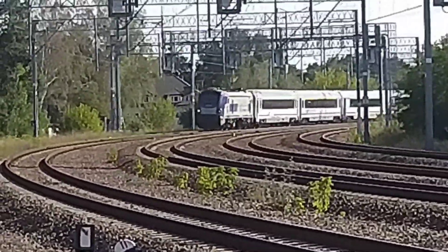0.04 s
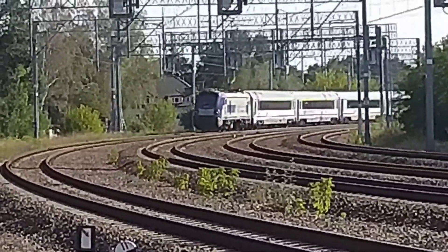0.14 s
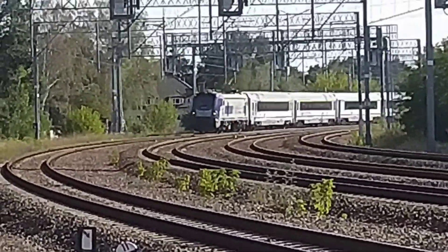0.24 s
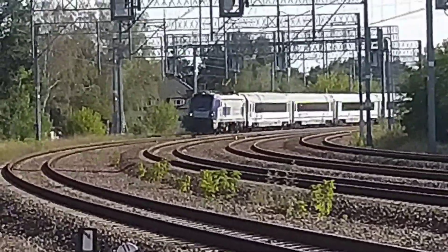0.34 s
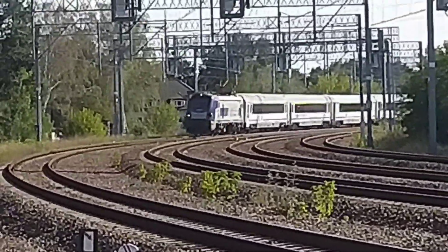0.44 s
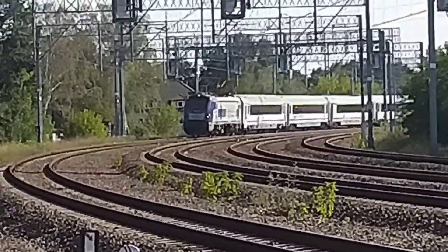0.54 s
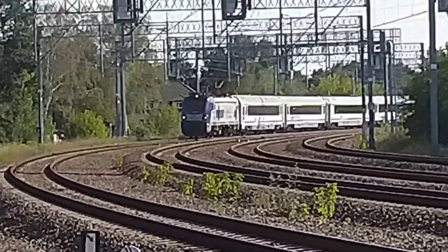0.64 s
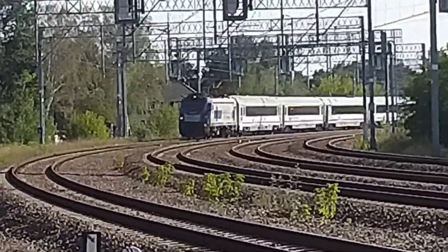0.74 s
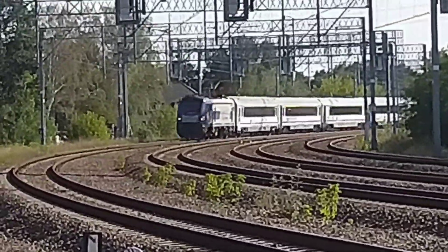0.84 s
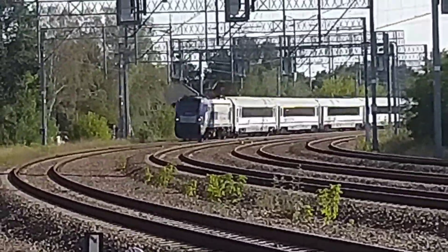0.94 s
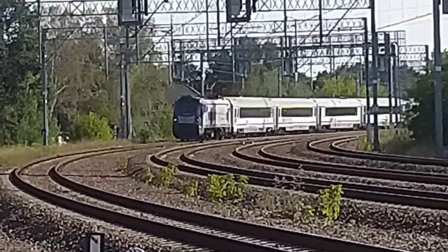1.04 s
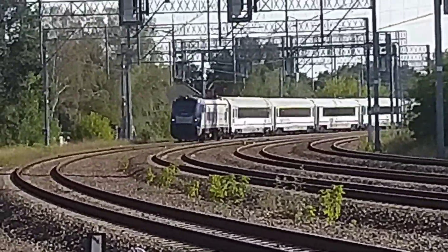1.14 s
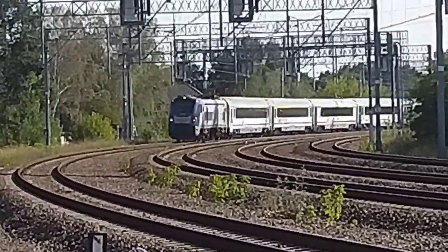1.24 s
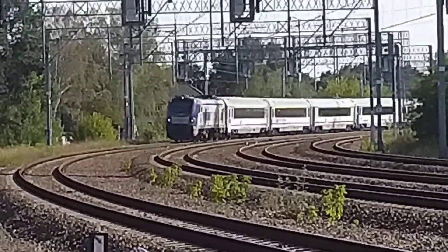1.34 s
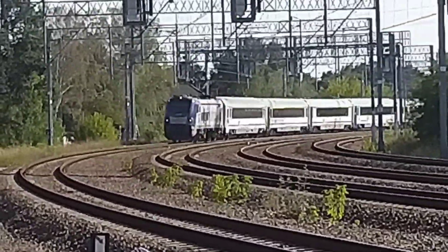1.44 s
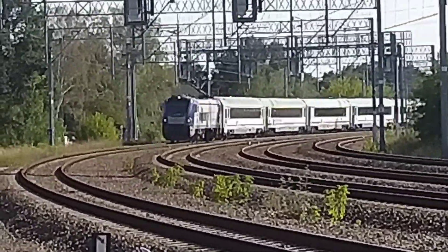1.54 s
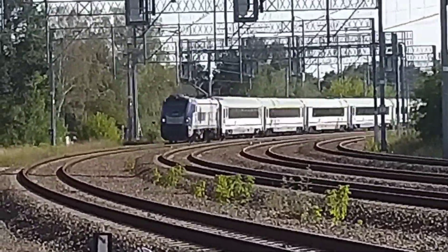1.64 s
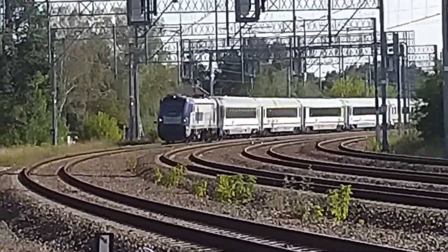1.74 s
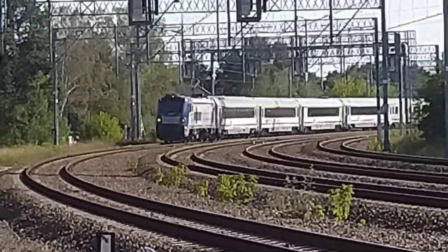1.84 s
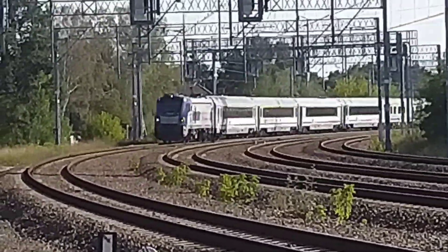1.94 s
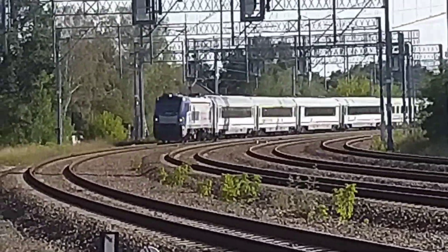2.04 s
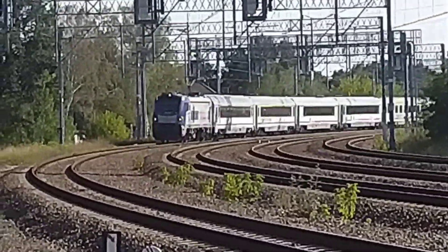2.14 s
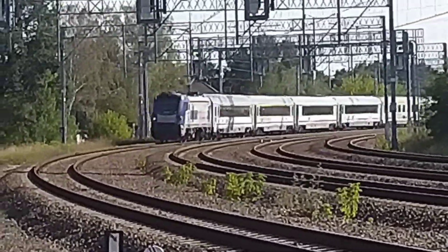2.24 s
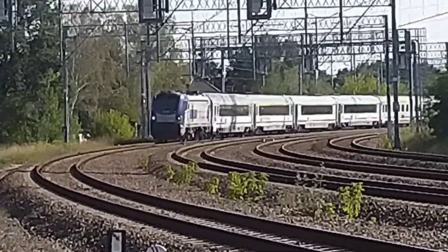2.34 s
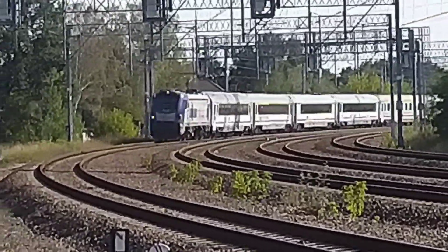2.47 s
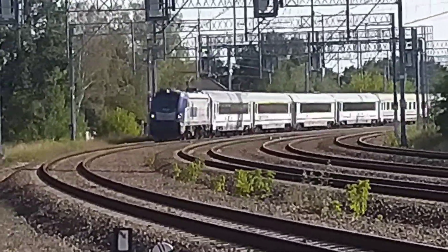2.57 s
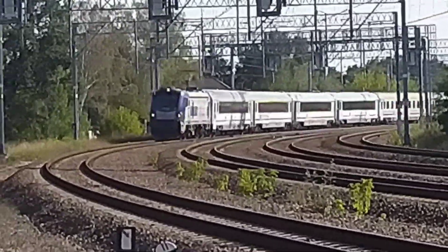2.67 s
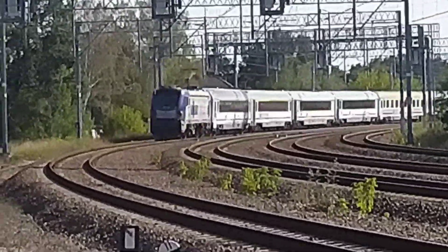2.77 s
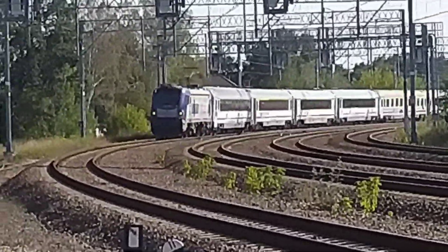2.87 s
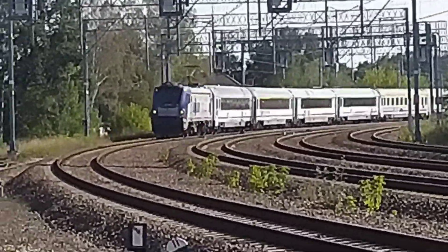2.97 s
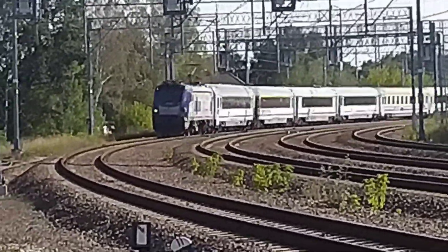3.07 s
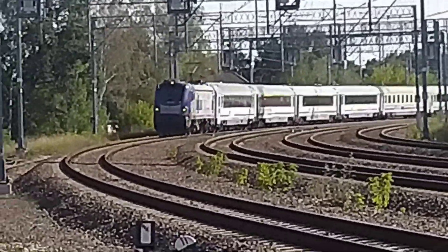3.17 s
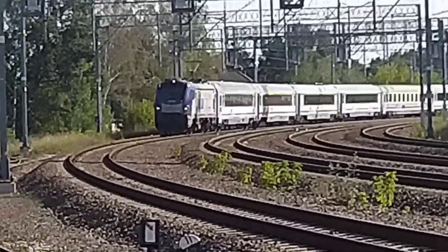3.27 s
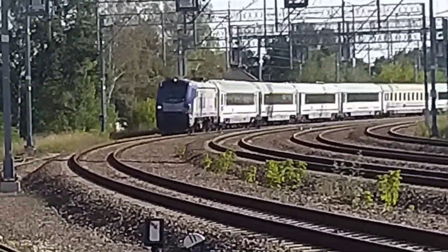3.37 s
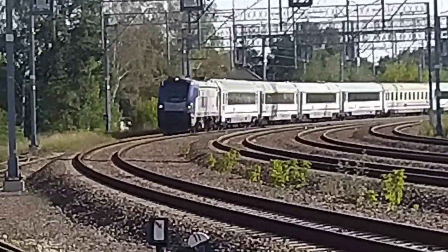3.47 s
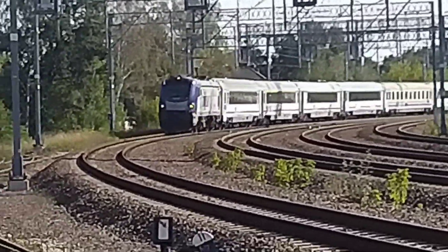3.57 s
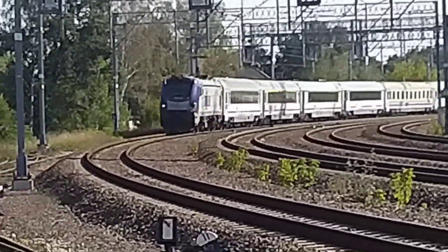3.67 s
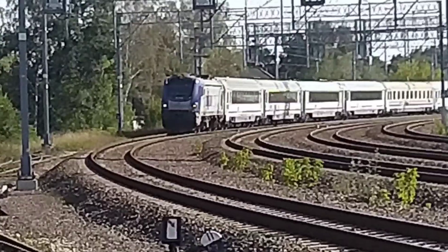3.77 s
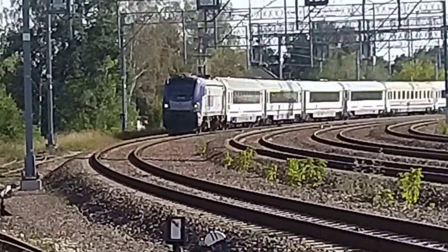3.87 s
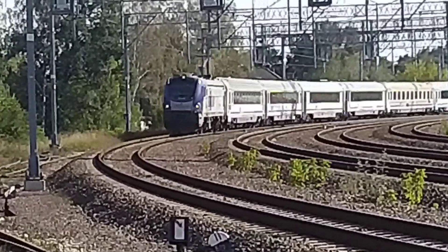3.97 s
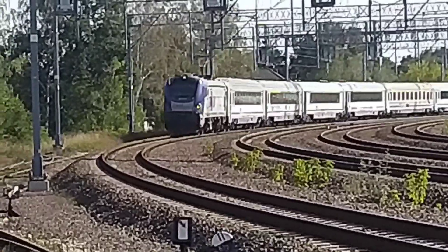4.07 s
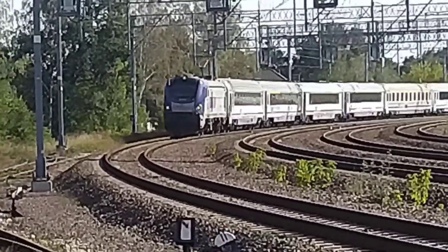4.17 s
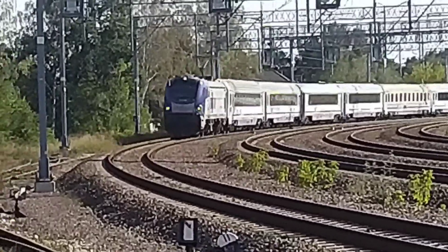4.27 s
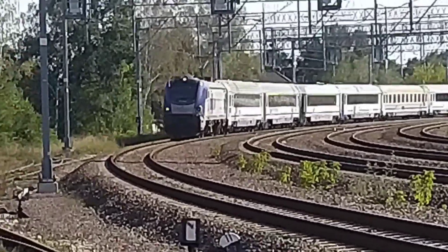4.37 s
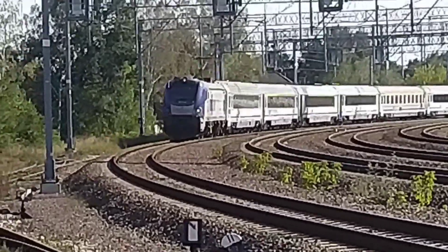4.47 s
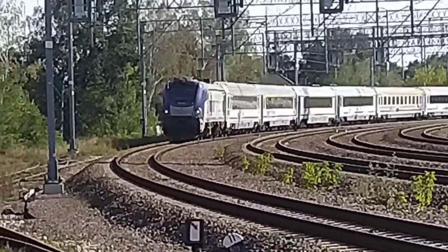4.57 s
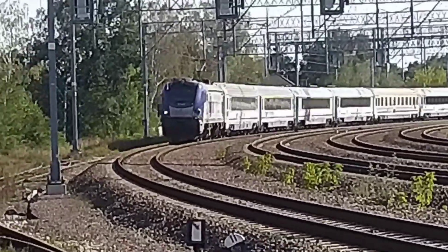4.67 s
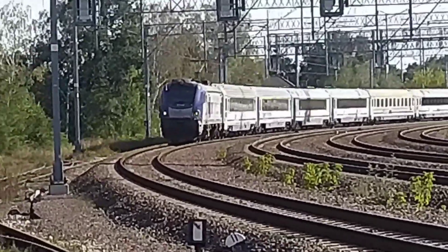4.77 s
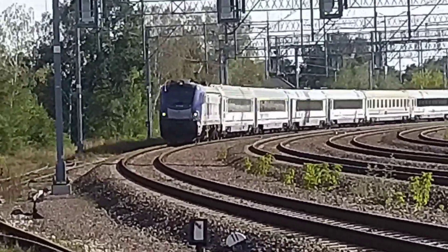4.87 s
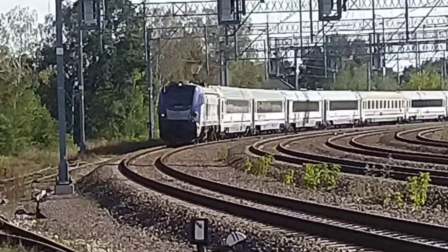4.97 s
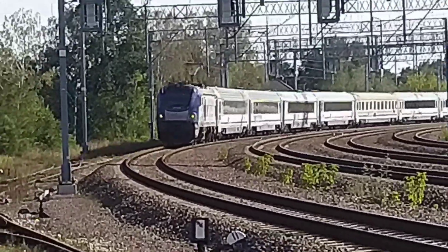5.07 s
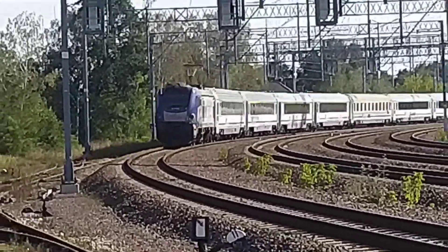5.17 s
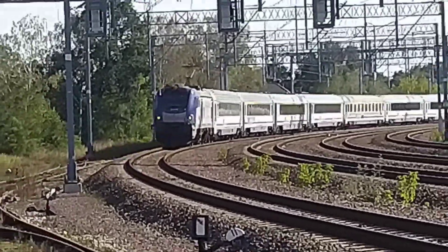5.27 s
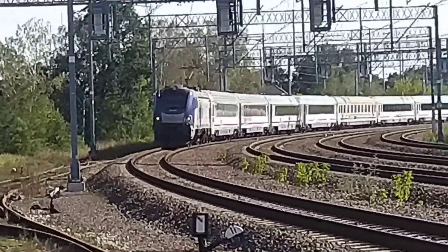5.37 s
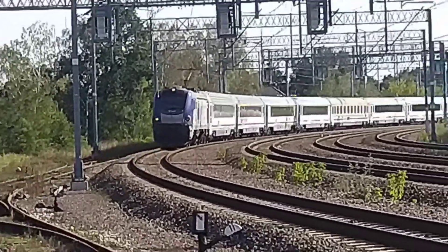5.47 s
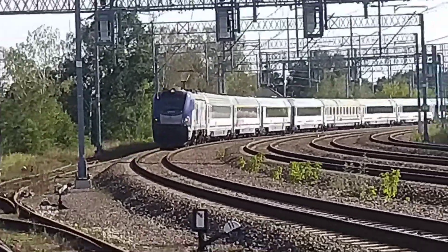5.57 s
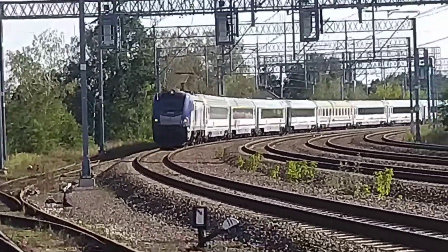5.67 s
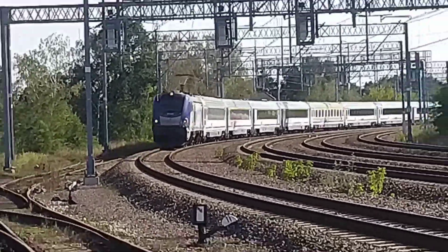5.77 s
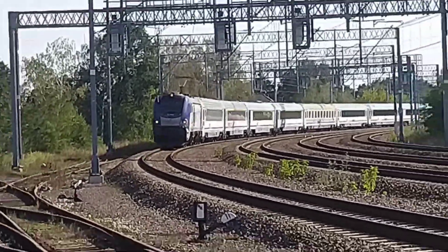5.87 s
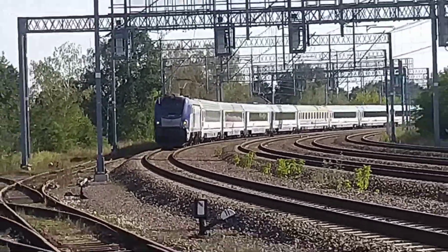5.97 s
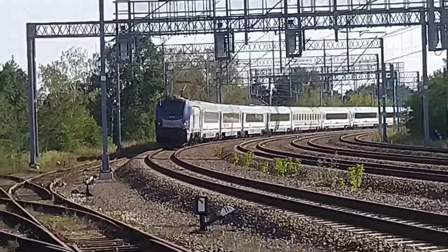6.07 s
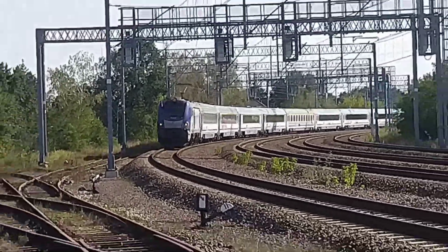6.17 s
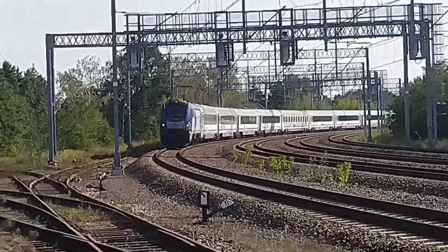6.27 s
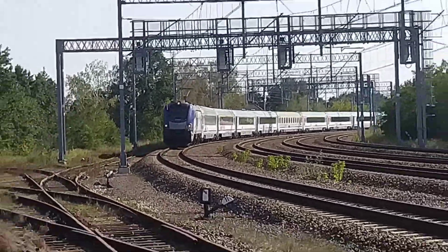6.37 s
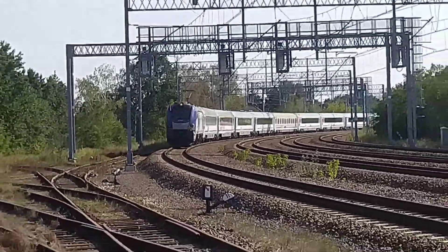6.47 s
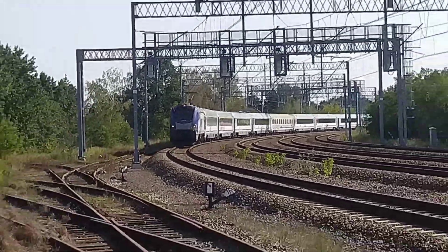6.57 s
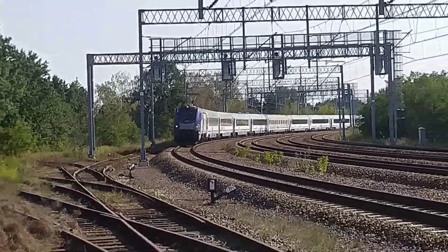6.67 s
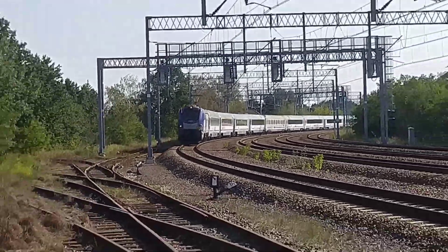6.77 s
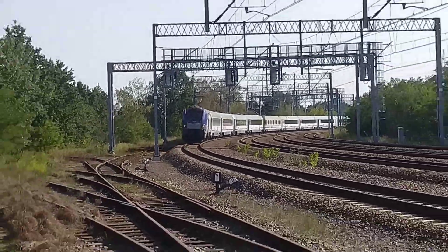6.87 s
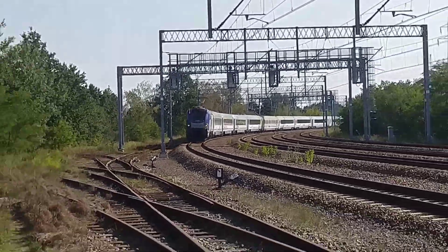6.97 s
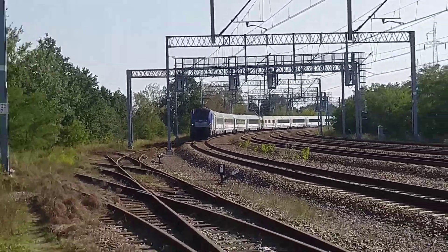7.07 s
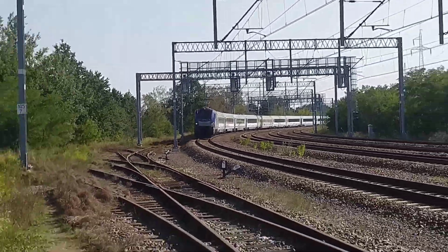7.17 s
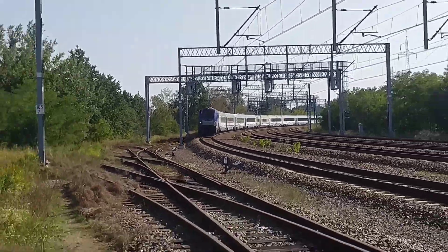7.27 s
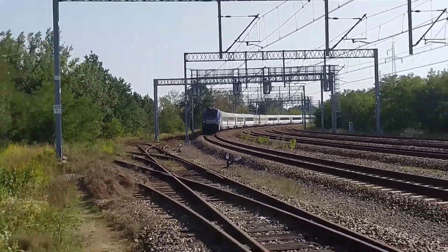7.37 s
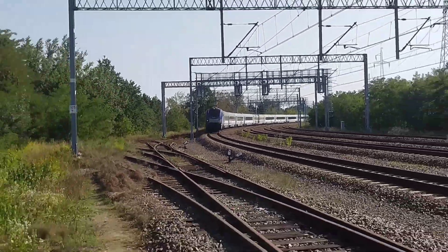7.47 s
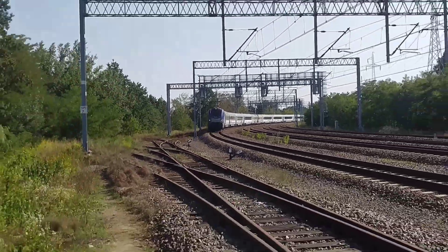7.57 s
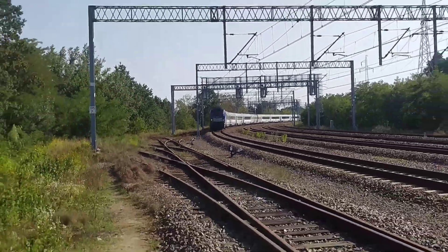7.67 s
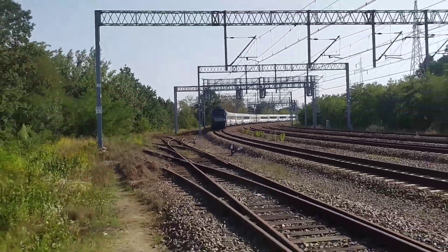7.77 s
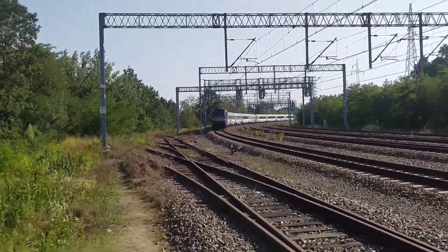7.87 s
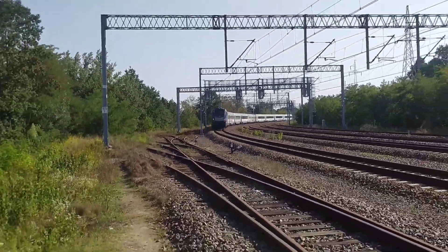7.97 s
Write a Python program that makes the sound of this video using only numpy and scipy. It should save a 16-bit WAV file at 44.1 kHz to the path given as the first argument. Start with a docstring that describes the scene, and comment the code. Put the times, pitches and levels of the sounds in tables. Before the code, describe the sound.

The rolling roar of an approaching electric train builds gradually outdoors, with a thin, intermittent zoom motor whine and light handling bumps.

```python
"""Beside a railway curve, an electric passenger train approaches and slowly grows louder.
Its wheels turn five times a second, so their rough treads and small flats drive the resonances of
rails and sleepers periodically: gliding pings recur in the roar, and the ground rumbles underneath.
Close by on the right, the zoom motor of a hand-held camera sizzles in fits and starts, and fingers
bump the camera body. Faint hums and the hiss of the open air lie behind."""
import sys
import numpy as np
from scipy import signal
from scipy.fft import rfft, irfft, next_fast_len
from scipy.io import wavfile
from scipy.ndimage import uniform_filter1d

SR = 44100
rng = np.random.default_rng(int(sys.argv[2]) if len(sys.argv) > 2 else 0)


def put_to_file(sound):
    """Save the sound as 16-bit audio at rate SR, in the file named by the first command-line argument."""
    columns = np.atleast_2d(sound).T  # one column per channel
    safe = np.clip(columns, -1, 1)
    whole_steps = np.round(safe * 32767)
    wavfile.write(sys.argv[1], SR, whole_steps.astype(np.int16))


N = 353858

TURN_S = .2005   # one revolution of a wheel
# level difference between the channels: frequency_hz, left_minus_right_db
BALANCE = [(60, 4.5), (400, 3), (880, 2.5), (1100, 0.5), (1330, -7.5), (1400, -6), (1900, -7.5),
           (2400, -23), (3500, -10.5), (5500, -13), (7000, -8.5), (8500, -22), (11000, -14.5),
           (13500, -32.5)]


def from_db(db):
    """Amplitude ratio of a level in decibels."""
    return 10 ** (np.asarray(db) / 20)


def rms_one(x):
    """Normalisation to unit mean power."""
    return x / np.sqrt(np.mean(x ** 2) + 1e-20)


def seconds():
    """The time of every sample."""
    return np.arange(N) / SR


def in_time(points):
    """Linear interpolation of a curve over time."""
    return np.interp(seconds(), *np.transpose(points))


def at_hz(points, hz):
    """Interpolation of a curve on a logarithmic frequency axis."""
    knots, values = np.transpose(points)
    return np.interp(np.log(hz + 1), np.log(knots), values)


def drift(rate_hz):
    """Slow random modulation: up to 2000 values of unit spread, joined by straight lines."""
    knots = rng.standard_normal(2000)
    return np.interp(seconds() * rate_hz, np.arange(len(knots)), rms_one(knots))


def resonances(modes, hz):
    """Frequency response of loosely coupled resonators, whose powers add."""
    return np.sqrt(sum(from_db(2 * db) * (hz * width) ** 2 / ((f * f - hz * hz) ** 2 + (hz * width) ** 2)
                       for f, width, db in modes))


def stereo_field(pair, response):
    """Partial coherence: two independent signals are filtered and mixed into left and right."""
    # similarity of the channels: frequency_hz, coherence_ratio
    coherence = [(60, 0.94), (1000, 0.89), (1320, 0.71), (1400, 0.11), (2100, 0.24), (3000, 0.035),
                 (6200, 0.26), (6900, 1), (7400, 0.29), (9000, .1), (12000, .45), (14000, .1)]
    # phase difference between the channels: frequency_hz, left_lead_rad
    phase_lead = [(60, 0), (450, 0.5), (900, 0.36), (1120, 0.4), (1350, -1), (1800, 2), (2700, 3),
                  (5500, -2), (6500, -2.5), (7300, -2.5), (10000, -53), (12000, -1), (13500, -1)]
    size, sides = next_fast_len(N + 8192), np.array([[1], [-1]])
    hz = np.arange(size // 2 + 1) * SR / size
    mid, side = rfft(np.array(pair), size) * response(hz)
    alike = np.clip(at_hz(coherence, hz), 0, 1)
    mixed = np.sqrt(1 + alike) * mid + sides * np.sqrt(1 - alike) * side
    phase = np.exp(.5j * sides * at_hz(phase_lead, hz))
    pan = 1 / np.sqrt(1 + from_db(-2 * sides * at_hz(BALANCE, hz)))
    out = irfft(phase * pan * mixed, size)[:, :N]
    return out / np.std(out.mean(axis=0))


def noise(spectrum):
    """Spectral shaping of white noise, in stereo; the mean of the channels has unit power."""
    return stereo_field(rng.standard_normal((2, N)), lambda hz: from_db(at_hz(spectrum, hz)))


def whistle(lines):
    """A line spectrum: sines broadened by slight random frequency modulation."""
    return sum(np.sqrt(2) * from_db(db) * np.sin(2 * np.pi * np.cumsum(hz + wobble * drift(60)) / SR)
               for hz, wobble, db in lines)


def open_air():
    """Stationary broadband noise: the faint, even hiss of the open air."""
    # spectrum of the air: frequency_hz, density_db
    air_spectrum = [(3000, 3), (7000, -3), (8300, -1), (10400, 6.5), (14500, -13)]
    return from_db(-82) * noise(air_spectrum)


def far_hums(fade_s=.27, waver_db=1.5):
    """Low tones under slow amplitude modulation: each fades in, wavers and fades out."""
    # faint hums: start_s, stop_s, pitch_hz, level_db
    hums = [(-0.3, 1.28, 442.3, -63), (-0.1, 1.4, 51.4, -53.5), (1.3, 6.5, 52.06, -57),
            (1.3, 3.55, 63.7, -61), (1.5, 3.5, 128.1, -64.5), (4, 7.2, 159.8, -66)]
    t, out = seconds(), np.zeros(N)
    for start, stop, hz, db in hums:
        fade = np.clip(np.minimum(t - start, stop - t) / fade_s, 0, 1)
        out += fade * from_db(waver_db * drift(20)) * whistle([(hz, 2, db)])
    return out * from_db([[1.5], [-1.5]])


def damped_mode(age, hz, t60_s):
    """Free vibration after a soft impact: it builds in about half a cycle and decays exponentially."""
    onset = 1 - np.exp(-2 * hz * age)
    decay = np.exp(-np.log(1000) * np.minimum(age / t60_s, 10))
    return onset * decay * np.sin(2 * np.pi * hz * age)


def finger_knocks():
    """Impact excitation: fingers ring a low mode of the camera body, and hard contacts add a tick."""
    # bumps on the body: start_s, level_db, pitch_hz, t60_s, relative_tick_db
    bumps = [(0.0, -38, 35.7, 0.25, -38), (1.246, -30, 37.6, 0.19, -30), (1.262, -42, 92, 0.29, -20),
             (1.268, -35.5, 204, 0.055, -20), (4.668, -24, 340, 0.02, 1), (4.679, -35, 171, 0.056, -27)]
    # upper modes of the body: pitch_hz, level_db
    tick_modes = [(1000, -1.5), (1650, -11)]
    out = np.zeros(N)
    for start, db, hz, t60_s, tick_db in bumps:
        age = np.maximum(seconds() - start, 0)
        tick = sum(from_db(tick_db + mode_db) * damped_mode(age, f, t60_s=.016)
                   for f, mode_db in tick_modes)
        out += from_db(db) * (damped_mode(age, hz, t60_s) + tick)
    return out * from_db([[1.5], [-1.5]])


def barrel_clack():
    """A transient at the lens barrel's main resonance, as it is jerked back into motion."""
    # the single clack: centre_s, pitch_hz, level_db, half_length_s
    clack = (7.5523, 7000, -32, .0012)
    centre_s, hz, db, half_s = clack
    offset = seconds() - centre_s
    envelope = from_db(db) * np.exp(-(offset / half_s) ** 2)
    return envelope * np.sin(2 * np.pi * hz * offset) * from_db([[-5], [3]])


def motor_envelopes(coast_db_per_s=163, idle_db=-18.5, whine_rise_s=.043):
    """Starting transient and exponential run-down: the amplitudes of gear hiss, rattle and whine."""
    # runs of the zoom motor: start_s, stop_s, effort_db, speed_name
    runs = [(0.226, 0.35, -14, "slow"), (0.402, 0.42, -18, "slow"), (0.463, 0.475, -19, "slow"),
            (0.528, 0.562, -14.5, "slow"), (0.799, 2.064, -0.6, "slow"), (2.13, 2.5, 0, "slow"),
            (2.581, 2.855, -1.2, "slow"), (2.927, 4.57, 0.73, "slow"), (4.877, 5.258, 2.1, "fast"),
            (5.423, 5.633, -1, "fast"), (5.897, 5.98, -2, "fast"), (6.058, 6.132, 0.5, "fast"),
            (6.227, 6.26, -1.5, "fast"), (6.324, 6.798, -0.5, "fast"), (6.899, 7.145, -1.5, "fast"),
            (7.247, 7.43, -2.5, "fast"), (7.536, 7.592, -2, "fast"), (7.683, 8.027, -3.5, "fast")]
    # base levels for each speed_name: hiss_db, rattle_db, whine_db
    speed_levels = {"slow": (-54, -60.5, -49.5), "fast": (-51, -52.5, -53.5)}
    # as the lens races out to wide angle, the load moves from the gears to the barrel
    race_from_s, hiss_fall_db_per_s, rattle_rise_db_per_s = 4.877, .5, 3.5
    t, drive = seconds(), np.zeros((3, N))
    next_starts = [run[0] for run in runs[1:]] + [N / SR]
    for (start, stop, effort_db, speed), end in zip(runs, next_starts):
        hiss_db, rattle_db, whine_db = speed_levels[speed]
        span = slice(int(start * SR), int(end * SR))
        age, raced_s = np.maximum(t[span] - start, 0), np.maximum(t[span] - race_from_s, 0)
        coast_db = np.maximum(-coast_db_per_s * np.maximum(t[span] - stop, 0), idle_db)
        # the teeth tick as they take up their slack, then scrape hard for a moment
        jerk_db = 3.5 * np.exp(-age / .0078) + 5 * np.exp(-age / .17)
        hiss = from_db(hiss_db + effort_db + coast_db + jerk_db - hiss_fall_db_per_s * raced_s)
        rattle = from_db(rattle_db + effort_db + .88 * coast_db + rattle_rise_db_per_s * raced_s)
        # the high whine needs some speed and is the first to go
        whine = (1 - np.exp(-age / whine_rise_s)) * from_db(whine_db + 2 * effort_db + 1.4 * coast_db)
        drive[:, span] = hiss, rattle, whine
    return uniform_filter1d(drive, size=32, axis=1)


def zoom_motor(barrel_lag_s=.0066, mesh_depth=.084, flutter_db=1.5):
    """Gear noise and forced vibration: meshing teeth hiss, whine and rattle the lens barrel."""
    # spectra of the gears and the barrel: frequency_hz, density_db
    gear_spectrum = [(8500, -68), (9100, -57), (9500, -39), (9900, -49), (10600, -47), (11100, -28),
                     (11900, 4.5), (12450, 11), (13000, 10.5), (13400, 14), (13900, -1), (14400, -1),
                     (15000, -13)]
    barrel_spectrum = [(4000, -20.5), (4850, -36), (5100, -14), (5350, -8), (5650, -15), (6000, -11.5),
                       (6300, -21.5), (6600, 0), (7000, 8.5), (7220, 2), (7420, -33), (8300, -117),
                       (9200, -15), (9700, -29), (10800, -21), (11800, -1.5), (13000, -20.5)]
    # tones of the motor and the barrel: pitch_hz, wobble_hz, level_db
    high_lines = [(12720, 3, 0), (12688, 5, -14), (12815, 8, -11), (12844, 10, -11)]
    lower_lines = [(9941, 14, 0)]
    barrel_lines = [(6491, 18, -15), (6977, 14, -9), (7099, 14, -11)]
    # the lower whine sets in with the fast zoom and sings on through the pauses: time_s, level_db
    lower_swell = [(4.75, -100), (5, -75), (5.8, -78), (6.4, -76), (6.6, -69), (7.3, -71), (8, -63)]
    hiss, rattle, whine = motor_envelopes()
    # the barrel is slow to follow the gears
    pole = np.exp(-1 / (barrel_lag_s * SR))
    rattle = signal.lfilter([(1 - pole) ** 2], [1, -2 * pole, pole ** 2], rattle)
    # three gear wheels throb, each at its own rate, under an uneven load
    throb = sum(share * np.sin(2 * np.pi * hz * seconds() + .92 * drift(2.06))
                for hz, share in [(32.3, .9), (41, 1), (95.9, .87)])
    load = (1 + mesh_depth * throb) * from_db(flutter_db * drift(40) + 1.2 * drift(4.7))
    ringing = whistle(barrel_lines) * from_db([[-5], [3]])
    lower_gain = from_db(in_time(lower_swell) + 1.3 * drift(8))
    lower_whine = lower_gain * whistle(lower_lines) * from_db([[-12], [5]])
    barrel = rattle * from_db(3 * drift(30) + .36 * drift(330)) * (noise(barrel_spectrum) + ringing)
    gears = (hiss + from_db(-77)) * noise(gear_spectrum)
    high_whine = whine * whistle(high_lines) * from_db([[-25], [5.5]])
    return barrel + load * (lower_whine + gears + high_whine)


def approaching(start_db, loss_db_per_m, start_m=350, speed_m_per_s=14.5):
    """Spherical spreading and damping along the track: both losses shrink as the train nears."""
    covered_m = speed_m_per_s * seconds()
    return from_db(start_db + loss_db_per_m * covered_m) * start_m / (start_m - covered_m)


def rolling_force(rail_roughness_db=5, blow_db=-3, blow_s=.009, wander_db=.7, jolt_s=.005):
    """Roughness excitation: each tread and its flat recur once a turn; the rail is always new."""
    # wheels with a flat spot: first_blow_s, extra_turn_ms, relative_blow_db
    flats = [(.056, .02, -4), (.0785, 0, -1), (.125, -.06, -4), (.152, -.08, -3), (.178, .22, -5)]
    # a wheel comes down harder than usual: time_s, extra_force_db
    hard_blows = [(1.886, 5), (3.688, 4), (3.809, 8), (4.089, 5)]
    t, force = seconds(), np.zeros(N)
    for first_s, extra_ms, flat_db in flats:
        turn_s = TURN_S + extra_ms / 1000
        tread = rng.standard_normal(int(turn_s * SR))
        # the flat is a short, very rough stretch of the tread
        length = int(blow_s * SR)
        blow = rms_one(np.hanning(length) * rng.standard_normal(length))
        tread[:length] += np.sqrt(turn_s / blow_s) * from_db(flat_db + blow_db) * blow
        turn_fraction = (t - first_s + blow_s / 2) / turn_s % 1
        contact = (turn_fraction * len(tread)).astype(int) % len(tread)
        force += tread[contact] * from_db(wander_db * drift(1.4))
    jolts = 1 + sum(from_db(db) * np.exp(-((t - s) / jolt_s) ** 2) for s, db in hard_blows)
    return jolts * rms_one(rms_one(force) + from_db(rail_roughness_db) * rng.standard_normal(N))


def ground_vibration(rolling, swell_db=1.5):
    """Ground-borne vibration: the rolling force drives deep, booming modes over a steady rumble."""
    # resonances of the ground: pitch_hz, width_hz, level_db
    ground_modes = [(38.6, 4, -17), (48.2, 23, 9.5), (64.2, 2.7, 3)]
    # course of the boom: time_s, level_db
    boom_levels = [(0, -52.5), (1.2, -57.5), (1.7, -62), (2.3, -56), (3.2, -51.5), (3.7, -56.5),
                   (4.3, -55.5), (4.8, -56), (5.6, -57.5), (6.4, -57), (6.7, -55), (6.95, -49), (7.4, -56),
                   (8, -51)]
    # spectrum of the rumble: frequency_hz, density_db
    rumble_spectrum = [(10, -18), (22, -1.5), (40, -6.5), (76, -6), (130, -5), (205, -4), (270, -10.5),
                       (390, -12), (445, -9), (500, -12), (700, -11), (2500, -95)]
    gain = from_db(in_time(boom_levels) + swell_db * drift(6))
    shaking = [rolling + rng.standard_normal(N), rng.standard_normal(N)]
    boom = stereo_field(shaking, lambda hz: resonances(ground_modes, hz) / (1 + (hz / 85) ** 6))
    return gain * boom + from_db(-52.5) * noise(rumble_spectrum)


def wheel_hiss():
    """Radiation from the wheels: the treble of the rolling noise, rising as the distance falls."""
    # spectrum of the wheels: frequency_hz, density_db
    wheel_spectrum = [(900, -9.5), (1370, -2.5), (1470, -0.5), (1530, 0), (1580, 4), (1640, -2.5),
                      (1715, 4.5), (1800, -2.5), (2100, 1.5), (2400, 8.5), (2650, -0.5), (3000, -5.5),
                      (3500, -14), (4500, -19.5), (5400, -13.5), (7000, -15), (9000, -100)]
    # propagation of the hiss: start_db, loss_db_per_m
    wheel_path = (-56, 0.063)
    return approaching(*wheel_path) * noise(wheel_spectrum)


def tread_pings(sleeper_gain, rail_gain, sleeper_top_hz=700, fade_db_per_s=.15, wander_db=1.3):
    """Periodic excitation: each worn patch of tread rings a short gliding tone once a turn."""
    # pings of the track: first_s, pitch_hz, glide_hz_per_s, half_length_s, level_db
    pings = [(.0197, 870, -2900, .008, -2.5), (.049, 648, 500, .028, 0.5), (.056, 745, -1700, .012, -9),
             (.0576, 968, 3700, .007, -5), (.063, 468, 500, .026, -2.7), (.081, 985, 0, .007, -3),
             (.085, 1210, 7000, .009, -7), (.086, 874, -400, .021, -1.2), (.111, 774, -400, .022, -4.3),
             (.113, 1280, -2800, .008, -11), (.1225, 950, -6400, .004, -3.5), (.143, 808, -3700, .012, -8),
             (.1477, 917, -11000, .011, -3), (.1914, 1270, -3700, .006, -6),
             (.1973, 874, -4800, .012, -2.2), (.198, 771, 3900, .012, -6), (.199, 474, -300, .026, -2),
             (.213, 975, 2000, .012, -6), (.039, 1118, 1500, .011, -10), (.155, 1235, -3300, .014, -8),
             (.178, 1108, -1500, .012, -12)]
    t, out = seconds(), np.zeros((2, N))
    for first_s, hz, glide, half_s, db in pings:
        offset = (t - first_s + TURN_S / 2) % TURN_S - TURN_S / 2
        phase = 2 * np.pi * (hz + glide * offset / 2) * offset
        tone = np.sqrt(2) * np.cos(phase + .5 * drift(1.99) + .3 * drift(110))
        # as more wheels come within earshot, the pings sink into the roar
        level_db = db - fade_db_per_s * t + wander_db * drift(5)
        envelope = np.exp(-(offset / half_s) ** 2) * from_db(level_db)
        pan = np.sqrt(2 / (1 + from_db(-2 * np.array([[1], [-1]]) * at_hz(BALANCE, hz))))
        out += pan * envelope * tone * (sleeper_gain if hz < sleeper_top_hz else rail_gain)
    return out


def track_roar(rolling):
    """Forced resonance: under the rolling wheels the sleepers drone, the rails roar and both ping."""
    # resonances of the track: pitch_hz, width_hz, level_db
    sleeper_modes = [(423, 29, -0.5), (474.6, 21.5, 6), (616, 27, 5), (652, 21, 6.5), (718, 15, 7.5),
                     (810, 45, 7.5)]
    rail_modes = [(783, 55, -9), (876, 23, -2.5), (890, 60, -6), (958, 23, -4), (997, 34, -4),
                  (1103, 47, -6), (1199, 35, -6), (1244, 50, -6.5), (1315, 49, -3)]
    # propagation along the track: start_db, loss_db_per_m
    sleeper_path = (-65, 0.17)
    rail_path = (-46.5, 0.075)
    # swells and sags on the way: time_s, gain_db
    sleeper_swell = [(0, 2), (2, -2.8), (3.4, -1), (4.3, 0), (5.2, 1), (6.3, -0.2), (7.2, -1.5), (8, -0.5)]
    rail_swell = [(0, 0), (.6, -0.5), (1.1, -0.1), (2.2, 0.3), (3.8, 0), (4.4, 1.2), (5.2, 1.2), (5.8, .3),
                  (6.3, 1.5), (7.2, 0.6), (8, -0.1)]
    sleeper_gain = approaching(*sleeper_path) * from_db(in_time(sleeper_swell))
    rail_gain = approaching(*rail_path) * from_db(in_time(rail_swell))
    force = [rolling, rng.standard_normal(N)]
    # a low-pass and a high-pass confine each set of modes to its band
    sleepers = stereo_field(force, lambda hz: resonances(sleeper_modes, hz)
                            / (1 + (hz / 840) ** 14) / (1 + (370 / (hz + 1)) ** 8))
    rails = stereo_field(force, lambda hz: resonances(rail_modes, hz)
                         / (1 + (hz / 1325) ** 90) / (1 + (690 / (hz + 1)) ** 10))
    roar = from_db(-.5) * sleeper_gain * sleepers + from_db(-3) * rail_gain * rails
    return roar + tread_pings(sleeper_gain, rail_gain)


def scene():
    """Superposition of the background, the near camera and the far train."""
    camera = finger_knocks() + barrel_clack() + zoom_motor()
    rolling = rolling_force()
    train = ground_vibration(rolling) + wheel_hiss() + track_roar(rolling)
    return open_air() + far_hums() + camera + train


def record(dry, cutoff_hz=14950):
    """Band limiting: an elliptic low-pass filter cuts the top steeply."""
    return signal.sosfilt(signal.ellip(10, .1, 80, cutoff_hz, fs=SR, output="sos"), dry)


dry = scene()
out = record(dry)
put_to_file(out)
```